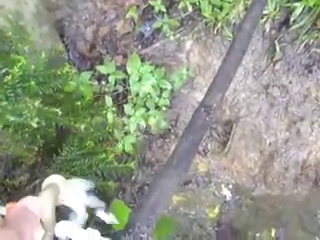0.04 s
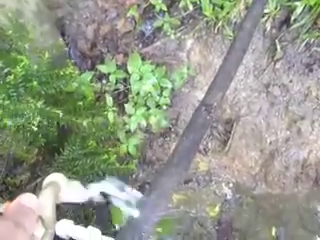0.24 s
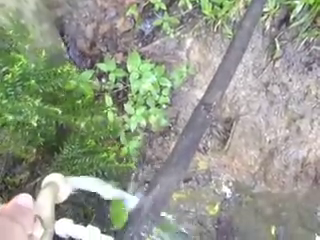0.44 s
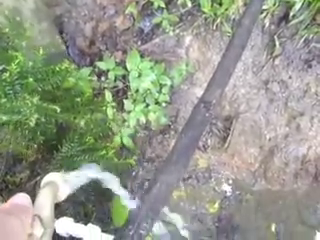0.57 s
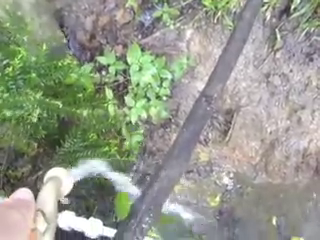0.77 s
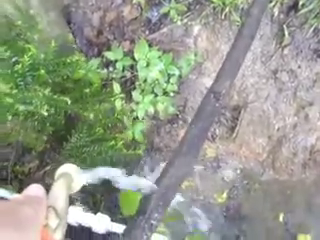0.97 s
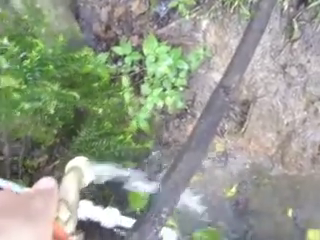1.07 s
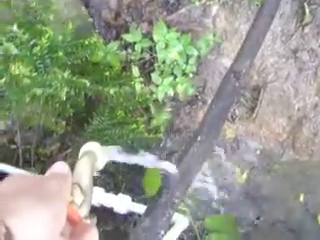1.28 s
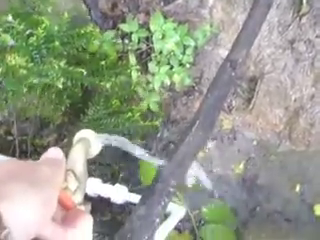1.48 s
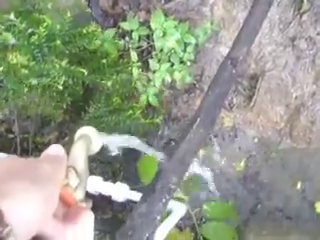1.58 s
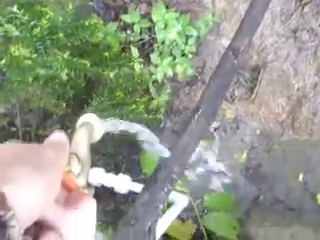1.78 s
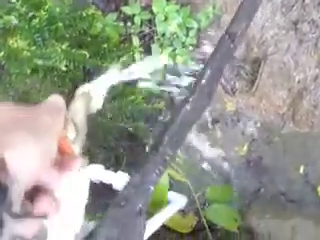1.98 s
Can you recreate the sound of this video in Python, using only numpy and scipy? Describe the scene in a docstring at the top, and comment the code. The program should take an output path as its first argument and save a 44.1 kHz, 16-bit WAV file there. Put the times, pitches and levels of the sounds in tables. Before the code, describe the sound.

A thin stream of tap water drips and patters on leaves and wet soil outdoors, growing busier with sharp drop smacks, then trapped air bursts out in a loud gurgling gush; close, dry, small thin-sounding microphone.

```python
"""A freshly opened garden tap, heard close by from just above: its thin jet patters on leaves and wet soil, and
near the end trapped air bursts out in a loud, gurgling gush of spray. Gush: clumped random grains, coloured as
thud, gurgle, splash and spray, with rising bubble notes. Fat drops smack and plink in noise bursts; ticks make
the patter, and shaped noise the steady hiss. Ground and plants return short echoes; the deepest bass is cut
away."""
import sys
import numpy as np
from scipy import signal
from scipy.io import wavfile
from scipy.ndimage import uniform_filter1d

SR = 44100
rng = np.random.default_rng(int(sys.argv[2]) if len(sys.argv) > 2 else 0)


def persist_wave(psi):
    """Save psi, clipped to +-1, as 16-bit WAV."""
    counts = np.round(np.clip(psi, -1, 1) * 32767).astype(np.int16)
    wavfile.write(sys.argv[1], SR, np.atleast_2d(counts).T)


N = 89478  # length in samples

# Hiss of the jet and the garden: hz, level_db
WASH_SPECTRUM = [(18, -48), (30, -48), (141, -3), (365, 1), (1100, 1.5), (2350, -1.5), (5690, -5.5),
                 (10500, -11.5), (13600, -90)]
WASH_DB, WASH_PATCH_DB = -52, 2  # overall rms; depth of the drifting patches

# Echoes: level_db against the direct sound, and decay time
GARDEN_DB, GARDEN_T60_S = -16, .2
GROUND_DB, GROUND_DECAY_S = -9, .002

# Loudness of the small droplets over time: time_s, level_db
PATTER_LEVEL = [(0, -80), (.12, -59), (.3, -56.5), (.5, -60.5), (.68, -53), (.8, -54.5), (.96, -47.5),
                (1.22, -54), (1.42, -51.5), (1.55, -49), (1.75, -51), (2.03, -45)]
# Colour of the small droplets: pitch_hz, level_db
PATTER_SPECTRUM = [(600, -11), (1300, -24.5), (2300, -2.5), (4000, -2), (6000, 4.5), (10000, -3.5)]
PATTER_PER_S, PATTER_SPREAD_DB = 1200, 2.5
PATTER_DECAY_CYCLES = 4.8  # cycles in one decay time

# Fat drops: start_s, level_db (before DROP_DB), ring_hz, smack_db (against the ring)
FAT_DROPS = [(0, -27, 2470, -5.5), (.029, -31, 2170, -10), (0.2245, -30.5, 2030, 3), (.237, -37, 2330, -14),
             (.291, -31.5, 1890, -3), (0.3143, -31, 2640, -11), (.328, -30.5, 2560, -2),
             (.410, -34, 5700, -18), (.4225, -36.5, 2330, -9), (.578, -32, 2220, -3),
             (.587, -30.5, 2050, 4), (.6095, -32, 5800, 0), (.6555, -35.5, 2930, 1.5),
             (.7173, -24.5, 2970, 5), (0.734, -22.5, 2200, -5), (0.7495, -20.5, 2140, 5),
             (.7548, -25, 2220, 0), (0.7784, -19, 3000, 6), (0.7818, -19.5, 3950, 13),
             (0.795, -22, 2260, -2), (.851, -29, 5960, -2), (0.907, -31.5, 4670, 9),
             (0.928, -20.5, 6200, -3.5), (0.9544, -28.5, 4700, 0), (1.0699, -19.5, 3480, 6),
             (1.0764, -18.5, 3020, 3), (1.1595, -22.5, 4750, -13), (1.168, -31, 8300, -8),
             (1.351, -28, 6300, -1), (1.3864, -13, 3470, -14), (1.3869, -19.5, 5060, -11),
             (1.4508, -29, 2730, 0), (1.4688, -21, 6950, -21), (1.509, -25.5, 4920, -7),
             (1.545, -24, 2460, 0), (1.568, -24.5, 5800, 6), (1.6344, -16.5, 2950, 7.5),
             (1.6619, -19.5, 3020, 4), (1.6992, -22, 3000, -2), (1.7116, -25, 3520, -4),
             (1.732, -24.5, 2090, 4), (1.7522, -25, 2440, 1), (1.765, -29, 2830, 4), (1.789, -28, 5800, 6),
             (1.8017, -25.5, 2970, 13), (1.8095, -18, 2800, -15), (1.8209, -9, 2610, -13),
             (1.827, -10.5, 3350, -7), (1.8438, -14, 7980, 5), (1.8525, -18.5, 4450, -11),
             (1.9155, -26, 5860, -18), (1.931, -14.5, 2930, -11), (1.9703, -13, 3880, -23),
             (2.0111, -23, 2920, -3)]
# Colour of a drop's smack: hz, level_db
SMACK_SPECTRUM = [(100, -47), (400, -18), (1000, -10), (2200, -1), (4000, 3), (6500, 0), (9000, -4),
                  (11000, -12)]
DROP_DB, DROP_LOW_CUT_HZ = -5.5, 372
SPLATTER_S, SNAP = .0022, 5.5  # decay time; first contact in multiples of the splatter
DROP_TAIL_DB, DROP_TAIL_S = -18, .02  # slower end of the splatter
RING_OCTAVES, RING_STEEPNESS = .5, 2.04  # shape of the ring's noise band
RING_NOTE_DB = -9  # pure note against the noisy ring

# Air pockets bursting in the water: start_s, level_db, pitch_hz, decay_s
AIR_POCKETS = [(.908, -38, 660, 0.0031), (1.073, -39, 1083, 0.0044), (1.8135, -26, 680, .0056),
               (1.8215, -13, 1885, 0.0048), (1.824, -16.5, 1225, 0.009), (1.851, -9.5, 1685, 0.0062),
               (1.8608, -28, 463, 0.0031), (1.901, -16.5, 1570, 0.0033), (1.9137, -21, 1550, 0.0013),
               (1.9342, -10.5, 1180, 0.0023), (1.935, -10, 1950, 0.0014), (1.95, -11.5, 980, 0.002),
               (1.954, -32, 630, .004), (1.9776, -6.5, 1600, 0.0012), (1.9774, -8, 1910, 0.002),
               (1.9869, -12.5, 1262, 0.0038), (2.0106, -17.5, 1220, 0.0017)]
POCKET_RISE_S, POCKET_GLIDE_PER_S = .00074, 8.7  # glide: pitch gained per second, in starting pitches
POCKET_SPIT_DB = -13.5  # spray against the note

# Gush: time_s, gurgle_db, splash_db, spray_db (each before its trim below)
GUSH_LEVELS = [(1.808, -34, -45, -43), (1.826, -29.5, -27.5, -35), (1.844, -23, -36, -21.5),
               (1.852, -24.5, -42, -23), (1.88, -35, -46.5, -30.5), (1.918, -24, -30.5, -26.5),
               (1.924, -38, -31.5, -34), (1.934, -26, -30.5, -38), (1.942, -32, -32.5, -36.5),
               (1.96, -29, -33, -29), (1.978, -17.5, -31, -27.5), (1.99, -30, -44, -35),
               (2.002, -61, -60, -43), (2.014, -25, -33.5, -36.5), (2.029, -72, -58, -46)]
GURGLE_DB, SPLASH_DB, SPRAY_DB = .5, 4.5, -3  # trims
# Colour of the gurgle, ahead of the spout resonance: hz, level_db
GURGLE_SPECTRUM = [(150, -24), (650, -12.5), (950, -3.5), (1300, 4), (2050, 4), (2500, -4.5), (5000, -11.5)]
# Colour of the splash: hz, level_db
SPLASH_SPECTRUM = [(300, -49), (1700, -5), (2550, -2), (3900, -1), (4800, -7.5), (8000, -28)]
# Colour of the fine spray: hz, level_db
SPRAY_SPECTRUM = [(1000, -47), (3800, -7.5), (5200, 4.5), (6500, -1), (8200, -3), (9500, -11.5),
                  (11000, -27)]
# Resonance of the air in the spout: time_s, pitch_hz
SPOUT_PITCH = [(1.81, 1700), (1.835, 1330), (1.853, 1670), (1.866, 1580), (1.888, 1890), (1.94, 1480),
               (1.955, 1100), (1.978, 1680), (1.992, 1350)]
SPOUT_WIDTH_HZ = 560
# Low thud of the surges: time_s, level_db
THUD_LEVEL = [(1.8, -74), (1.815, -32), (1.83, -34), (1.848, -50), (1.864, -45.5), (1.882, -61),
              (1.915, -38), (1.955, -41), (1.995, -57), (2.015, -36.5), (2.03, -62)]
# Colour of the thud: hz, level_db
THUD_SPECTRUM = [(40, -40), (110, -32), (220, -8.5), (420, 0), (1000, 8), (2000, -12), (5000, -51)]
GUSH_GRAINS_PER_S, GUSH_SPREAD_DB = 2000, 2.5
CLUMP_DB, CLUMP_S = 2.5, .004  # unevenness of the grain sizes; smoothing time

LOW_CUT_HZ, RECORDER_EDGE_HZ = 67, 11050


def amp(db):
    """Decibels to gain."""
    return 10 ** (np.asarray(db) / 20)


def unit(x):
    """Scales to rms 1."""
    return x / np.sqrt(np.mean(x ** 2) + 1e-20)


def read_spectrum(points, hz):
    """Reads a level in dB from a spectrum on a log-frequency axis."""
    point_hz, db = np.transpose(points)
    return np.interp(np.log(hz + 1), np.log(point_hz), db)


def level(rows, column=1):
    """Gain over time from one dB column of a table."""
    rows = np.array(rows)
    return amp(np.interp(np.arange(N) / SR, rows[:, 0], rows[:, column]))


def add(mix, start_s, sound):
    """Mixes a sound in at start_s, cut off at the end of the mix."""
    part = mix[max(round(start_s * SR), 0):][:len(sound)]
    part += sound[:len(part)]


def colour(x, db_at, size=2048):
    """Causal minimum-phase filter whose gain in dB is db_at(Hz)."""
    hz = abs(np.fft.fftfreq(size, 1 / SR))
    log_gain = np.log(amp(db_at(hz)) + 1e-5)
    # the Hilbert transform of the log gain gives the minimum phase
    taps = np.fft.ifft(np.exp(np.conj(signal.hilbert(log_gain)))).real
    return signal.fftconvolve(x, taps[:size // 2])[:len(x)]


def high_pass(x, hz):
    """Second-order bass cut."""
    return signal.sosfilt(signal.butter(2, hz, "high", fs=SR, output="sos"), x)


def clicks(per_s, spread_db):
    """Random impacts of uneven size and either sign."""
    size = amp(spread_db * np.minimum(rng.exponential(1, N), 4))
    sign = rng.choice([-1, 1], N)
    return size * sign * (rng.random(N) < per_s / SR)


def wash(size=512):
    """Hiss of the jet and the garden: shaped noise whose level drifts in patches of time and pitch."""
    hz = np.fft.rfftfreq(size, 1 / SR)
    real, imag, patches = rng.standard_normal((3, N * 4 // size + 5, len(hz)))
    patches = uniform_filter1d(patches, size=6, axis=0)  # over time
    patches = unit(uniform_filter1d(patches, size=10, axis=1))  # over pitch
    gain = amp(read_spectrum(WASH_SPECTRUM, hz) + WASH_PATCH_DB * patches)
    frames = (real + 1j * imag) * gain
    hiss = signal.istft(frames.T, nperseg=size, noverlap=size * 3 // 4)[1][:N]
    return amp(WASH_DB) * unit(hiss)


def add_echoes(x, echoes, db):
    """Adds a scatter of echoes, set by its total energy against the direct sound."""
    echoes = echoes / np.linalg.norm(echoes)
    return x + amp(db) * signal.fftconvolve(x, echoes)[:N]


def garden(x):
    """A faint scatter from the plants: decaying noise as the echo pattern."""
    t = np.arange(SR // 3) / SR
    echoes = rng.standard_normal(len(t)) * amp(-60 * t / GARDEN_T60_S)
    return add_echoes(x, echoes, GARDEN_DB)


def ground(x):
    """Quick reflections from the soil around the landing drops, from 1.5 ms on."""
    t = np.arange(1024) / SR
    echoes = rng.standard_normal(len(t)) * (t > .0015) * np.exp(-t / GROUND_DECAY_S)
    return add_echoes(x, echoes, GROUND_DB)


def patter(pitches=32):
    """Small droplets, each a decaying tick of a few cycles at one of a set of pitches."""
    t = np.arange(1024) / SR
    out = np.zeros(N)
    for hz in np.geomspace(600, 10500, pitches):
        tick = np.sin(2 * np.pi * hz * t) * np.exp(-t * hz / PATTER_DECAY_CYCLES)
        impacts = clicks(PATTER_PER_S / pitches, PATTER_SPREAD_DB)
        ticks = signal.fftconvolve(impacts, unit(tick))[:N]
        out += amp(read_spectrum(PATTER_SPECTRUM, hz)) * ticks
    return unit(out) * level(PATTER_LEVEL)


def fat_drop(db, ring_hz, smack_db, size=4096):
    """A snap on contact, a broad smack, and a short wet plink from the leaf or puddle it hits."""
    t = np.arange(size) / SR
    hit = np.exp(-t / SPLATTER_S)
    fading = hit + amp(DROP_TAIL_DB) * np.exp(-t / DROP_TAIL_S)
    splatter = fading * rng.choice([-1, 1], (2, size))
    splatter[:, 0] = SNAP

    def ring_db(hz):
        octaves_off = np.log2((hz + 1) / ring_hz)
        return -20 * RING_STEEPNESS * np.log10(1 + (octaves_off / RING_OCTAVES) ** 2)

    smack = unit(colour(splatter[0], lambda hz: read_spectrum(SMACK_SPECTRUM, hz)))
    ring = unit(colour(splatter[1], ring_db))
    note = unit(hit * np.sin(2 * np.pi * ring_hz * t))
    sound = unit(ring + amp(RING_NOTE_DB) * note + amp(smack_db) * smack)
    # level_db scales the energy of the hit envelope
    return amp(db + DROP_DB) * sound * np.sqrt(np.mean(hit ** 2))


def fat_drops():
    """All the fat drops, with a bass cut that keeps their smacks and plinks light."""
    out = np.zeros(N)
    for start_s, *drop in FAT_DROPS:
        add(out, start_s, fat_drop(*drop))
    return high_pass(out, DROP_LOW_CUT_HZ)


def air_pocket(db, pitch_hz, decay_s, size=2048):
    """An air pocket pops: a short rising bubble note with a spit of spray."""
    t = np.arange(size) / SR
    note = np.sin(2 * np.pi * pitch_hz * (t + POCKET_GLIDE_PER_S * t ** 2 / 2))

    def spit_db(hz):
        return np.maximum(read_spectrum(GURGLE_SPECTRUM, hz), read_spectrum(SPLASH_SPECTRUM, hz))

    spit = unit(colour(rng.standard_normal(size), spit_db))
    shape = (1 - np.exp(-t / POCKET_RISE_S)) * np.exp(-t / decay_s)
    return amp(db) * shape * (note + amp(POCKET_SPIT_DB) * spit)


def air_pockets():
    """All the air pockets that burst in the water."""
    out = np.zeros(N)
    for start_s, *pocket in AIR_POCKETS:
        add(out, start_s, air_pocket(*pocket))
    return out


def resonate(x, hz, width_hz):
    """A resonance that follows the curve hz: shift it to 0 Hz, smooth, shift back."""
    turn = np.exp(2j * np.pi * np.cumsum(hz) / SR)
    r = np.exp(-np.pi * width_hz / SR)
    return 2 * (turn * signal.lfilter([1 - r], [1, -r], x / turn)).real


def gush_grains(spectrum):
    """Water torn into grains: coloured random impacts whose sizes swell in clumps."""
    clumps = unit(uniform_filter1d(rng.standard_normal(N), size=round(CLUMP_S * SR)))
    grains = clicks(GUSH_GRAINS_PER_S, GUSH_SPREAD_DB) * amp(CLUMP_DB * clumps)
    return unit(colour(grains, lambda hz: read_spectrum(spectrum, hz)))


def gush():
    """Air tears the jet into grains: thud and gurgle in the spout, splash and fine spray."""
    t = np.arange(N) / SR
    spout_hz = np.interp(t, *np.transpose(SPOUT_PITCH))
    gurgle = unit(resonate(gush_grains(GURGLE_SPECTRUM), spout_hz, SPOUT_WIDTH_HZ))
    sound = gush_grains(THUD_SPECTRUM) * level(THUD_LEVEL)
    sound += amp(GURGLE_DB) * gurgle * level(GUSH_LEVELS, column=1)
    sound += amp(SPLASH_DB) * gush_grains(SPLASH_SPECTRUM) * level(GUSH_LEVELS, column=2)
    sound += amp(SPRAY_DB) * gush_grains(SPRAY_SPECTRUM) * level(GUSH_LEVELS, column=3)
    return sound * (t > GUSH_LEVELS[0][0])  # silent before the first row


def scene():
    """All the water, heard from just above the tap, as one channel."""
    landing = ground(patter() + fat_drops())
    water = landing + air_pockets() + gush()
    return (wash() + garden(water))[None]


def record(dry):
    """A gentle bass cut, then the recorder's band limit."""
    sound = high_pass(dry, LOW_CUT_HZ)
    low_pass = signal.firwin(301, RECORDER_EDGE_HZ, window=("kaiser", 8), fs=SR)
    return signal.oaconvolve(sound, low_pass[None], "same")


dry = scene()
out = record(dry)
persist_wave(out)
```